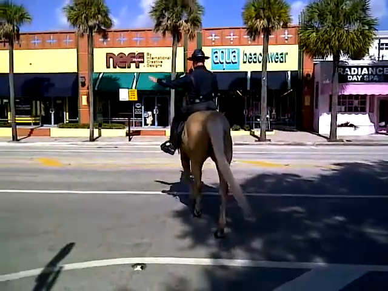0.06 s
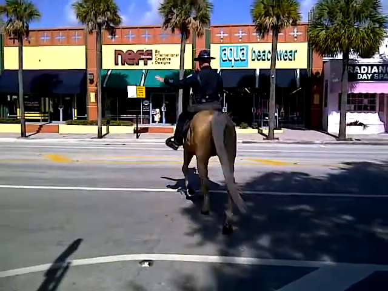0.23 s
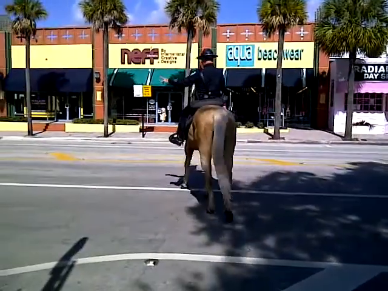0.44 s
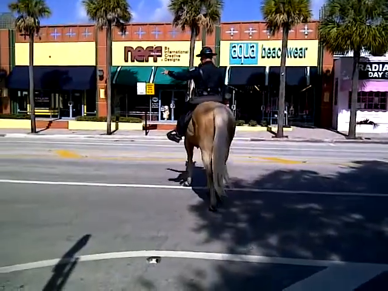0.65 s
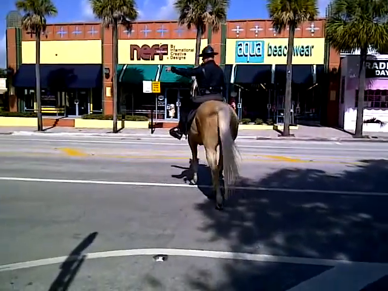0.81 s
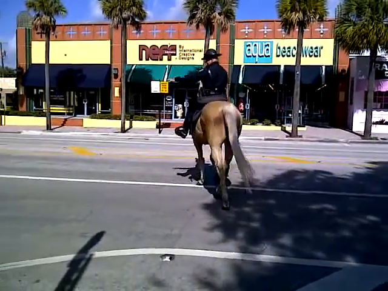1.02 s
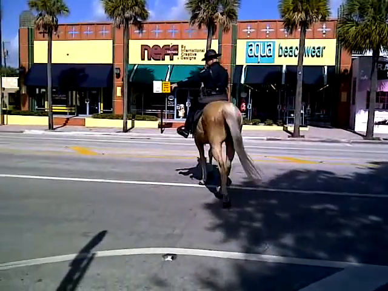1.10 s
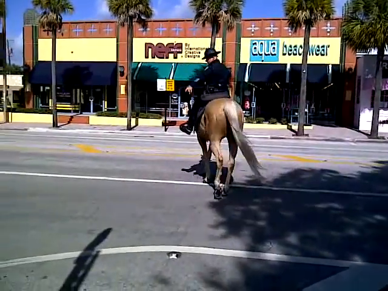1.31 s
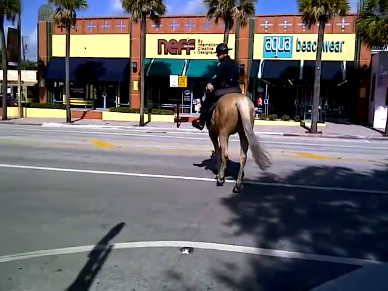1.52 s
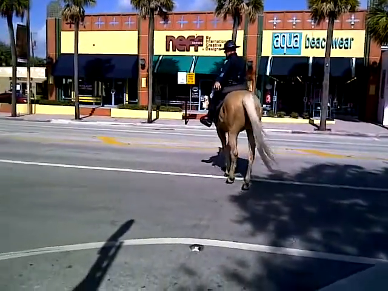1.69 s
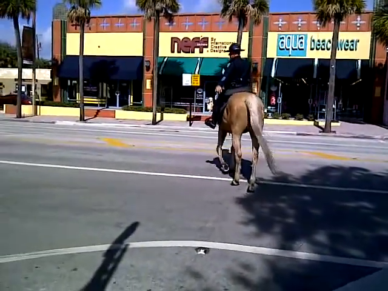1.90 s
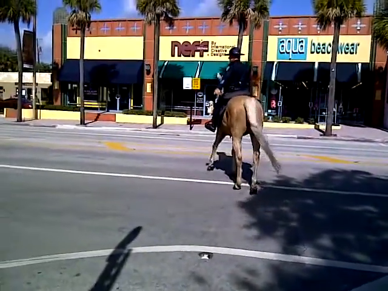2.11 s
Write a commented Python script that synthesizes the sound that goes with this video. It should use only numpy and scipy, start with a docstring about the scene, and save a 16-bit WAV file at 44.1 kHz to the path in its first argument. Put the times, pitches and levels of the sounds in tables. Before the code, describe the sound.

A shod horse walks on asphalt with about five sharp, hollow clops and slight gritty scrapes, the first step loudest. Shop fronts echo faintly, distant traffic hums throughout, and a brief low rumble rises near the end.

```python
"""A horse with iron shoes walks away over the asphalt of a wide shopping street.
Each step is a hard crack of the shoe, a clop from the hollow under the hoof and a little crushed
grit; now and then a shoe slides and scrapes. The shop fronts send back faint echoes.
Distant traffic hums throughout, and a low rumble swells near the end."""
import sys
import numpy as np
from scipy import signal
from scipy.fft import rfft, irfft
from scipy.io import wavfile
from scipy.ndimage import uniform_filter1d

SR = 44100
rng = np.random.default_rng(int(sys.argv[2]) if len(sys.argv) > 2 else 0)


def int16_out(signal):
    """Quantize to a 16-bit WAV file."""
    q = np.round(np.clip(np.atleast_2d(signal).T, -1, 1) * 32767)
    wavfile.write(sys.argv[1], SR, q.astype(np.int16))


N = 94815

TILT_PIVOT_HZ = 2000  # a positive tilt turns up what lies above this pitch and turns down what lies below


def undb(db):
    """Turn decibels (dB) into a number to multiply a sound by."""
    return 10 ** (np.asarray(db) / 20)


def noise(points, lo=0, hi=SR):
    """Noise of strength 1 shaped by (Hz, dB) points; only the part from lo to hi Hz is kept."""
    hz, db = np.array(points).T
    freqs = np.fft.rfftfreq(N, 1 / SR)
    gain = undb(np.interp(np.log(freqs + 1), np.log(hz), db)) * (freqs < hz[-1])
    band = rfft(rng.standard_normal(N)) * gain * (freqs >= lo) * (freqs < hi)
    return irfft(band, N) / np.sqrt(np.mean(gain ** 2))


def wander(rate):
    """A smooth random curve, typically of size 1, that takes about `rate` new values a second."""
    width = max(int(SR / rate), 1)
    steps = np.repeat(rng.standard_normal(N // width + 1), width)
    smooth = uniform_filter1d(uniform_filter1d(steps, width), width)[:N]
    return smooth / np.std(smooth)


def traffic():
    """Far traffic: bands of noise swell together and flicker alone, while the tyre noise recedes."""
    # The tone of the traffic. Each row: frequency in Hz, level in dB.
    spectrum = [(20, -27), (35, -15.5), (55, -2.5), (95, -6), (127, 0), (165, -5.5), (250, -4.5),
                (430, -11.5), (650, -9), (1000, -11.5), (1450, -12), (2000, -17.5), (2550, -23),
                (3200, -31.5), (4000, -35.5), (4700, -35.5), (6200, -44.5), (7000, -49.5), (8000, -68)]
    edges_hz = [0, 90, 180, 360, 720, 1440, 2880, 9000]
    level_db, tyres_from_hz, tyres_db_per_s = -41, 720, -1.0953
    swell_db = 0.8467 * wander(2.3)
    recede_db = tyres_db_per_s * (np.arange(N) - N / 2) / SR
    out = np.zeros(N)
    for lo, hi in zip(edges_hz, edges_hz[1:]):
        band = noise(spectrum, lo, hi)
        flicker_db = 0.4 * wander(18)
        out += band * undb(level_db + swell_db + flicker_db + recede_db * (lo >= tyres_from_hz))
    return out


def clop(t, hz, hold_s):
    """The hollow under the hoof sounds for a few uneven cycles, then the horse's weight damps it."""
    rise_s, decay_s = 0.000962, 0.001413
    pitch_hz = hz * (1 + 0.0478 * wander(478)[:len(t)])  # wavers as the hoof rolls flat
    tone = np.sin(2 * np.pi * np.cumsum(pitch_hz) / SR)
    return tone * (1 - np.exp(-t / rise_s)) * np.exp(-np.maximum(t - hold_s, 0) / decay_s)


def fade(t, seconds):
    """A level that falls by 60 dB, to a thousandth, in the given time."""
    return np.exp(-np.log(1000) * t / seconds)


def crack(t, tilt_db, detune=0.019, rise_s=0.0002):
    """The shoe hits the road and rings briefly, brighter if it lands on its edge, never twice alike."""
    # The ringing tones of shoe and hoof wall. Each row: pitch in Hz, level in dB, fade time in seconds.
    shoe_tones = [(610, -7, 0.0026), (1035, -6.5, 0.013), (1368, -2, 0.027), (1530, -13, 0.0013),
                  (2088, -5.5, 0.024), (2362, -8.5, 0.012), (2970, -17.5, 0.0094), (3241, -13, 0.016),
                  (4192, -13.5, 0.01904), (4597, -17, 0.0082), (5586, -19.5, 0.0097), (6390, -24, 0.012)]
    out = np.zeros(len(t))
    for hz, db, fade_s in shoe_tones:
        gain = undb(db + tilt_db * np.log2(hz / TILT_PIVOT_HZ))
        pitch_hz = hz * (1 + detune * rng.standard_normal())
        out += gain * fade(t, fade_s) * np.cos(2 * np.pi * pitch_hz * t)
    return out * (1 - np.exp(-t / rise_s))


def ring(t, hz, fade_s, rise_s=0.00023):
    """One tone that stands out in a step: a clack of the hoof wall or a ping of the iron."""
    return np.sin(2 * np.pi * hz * t) * (1 - np.exp(-t / rise_s)) * fade(t, fade_s)


def hooves():
    """Each touch of a hoof on the road makes a clop, a crack, a clack, a ping and a crunch of grit."""
    # Steps and light toe touches. Each row: start in seconds, clop pitch in Hz, clop level in dB,
    # clop hold in seconds, crack level in dB, crack tilt in dB per octave, grit level in dB,
    # grit decay in seconds, clack pitch in Hz, clack level in dB, ping pitch in Hz, ping level in dB.
    touches = [(0.2081, 847.4, -8, 0.00444, -19.5, 1, -29.5, 0.0046, 2850, -27.5, 4700, -35),
               (0.5817, 1520, -35.5, 0.00094, -46.5, 5, -55.5, 0.00375, 1600, -39, 5000, -58.5),
               (.5950, 1100, -23, 0.00075, -50.5, 3, -43.5, 0.0037, 1450, -41.5, 4250, -50),
               (0.6007, 778, -17.5, 0.00171, -32, -3, -37.5, 0.0063, 2519, -29.5, 4270, -41),
               (0.9702, 811, -16.5, 0.0028, -32, -2.5, -39.5, 0.00474, 1195, -26, 6200, -55),
               (1.2727, 1539, -26, 0.00227, -39.5, 1.5, -40.5, 0.0049, 2097, -27, 6480, -47),
               (1.338, 1290, -36, 0.0017, -51, 2, -49, 0.0072, 2795, -44, 4450, -56),
               (1.356, 1159, -40, 0.011, -62, -1.5, -53.5, 0.0025, 2800, -47.5, 4400, -65.5),
               (1.448, 1455, -40, 0.00724, -58, -5, -49.5, 0.0032, 1144, -43.5, 4900, -71),
               (1.7073, 801, -17, 0.00031, -34, -1.5, -33, 0.00237, 1143, -27, 5830, -47.5),
               (1.7118, 655.5, -44.5, 0.0038, -38, 5.5, -43.5, 0.0028, 2686, -37, 4170, -50),
               (1.7378, 843, -29, 0.0037, -51, 1.5, -42.5, 0.0035, 2170, -44, 4250, -65.5)]
    # The tone of crushed grit. Each row: frequency in Hz, level in dB.
    grit_spectrum = [(150, 2.5), (600, -3), (1400, 21.5), (2600, 22.5), (3600, -11), (4400, -4),
                     (5500, -16), (6700, -26.5), (8000, -29)]
    out, grit = np.zeros(N), noise(grit_spectrum)
    t = np.arange(SR // 10) / SR
    for (start, clop_hz, clop_db, hold_s, crack_db, tilt_db, grit_db, grit_decay_s,
         clack_hz, clack_db, ping_hz, ping_db) in touches:
        span = slice(int(start * SR), int(start * SR) + len(t))
        out[span] += undb(clop_db) * clop(t, clop_hz, hold_s)
        out[span] += undb(crack_db) * crack(t, tilt_db)
        out[span] += undb(clack_db) * ring(t, clack_hz, fade_s=0.01357)
        out[span] += undb(ping_db) * ring(t, ping_hz, fade_s=0.015)
        out[span] += undb(grit_db) * grit[span] * np.exp(-t / grit_decay_s)
    return out


def scuffs():
    """A shoe slides over grit as it lands or lifts: a grainy scrape, thinner when the touch is light."""
    # The slides. Each row: start in seconds, length in seconds, level in dB, tilt in dB per octave.
    slides = [(.213, 0.0229, -39.5, -0.5), (0.363, .06, -62, 10), (0.581, .034, -46, -0.5),
              (1.333, .04, -49, 1.5)]
    # The tone of scraping iron. Each row: frequency in Hz, level in dB.
    spectrum = [(300, -17.5), (800, -7.5), (1250, 3.5), (1900, -3.5), (2600, -11.5), (3400, -20),
                (4300, -20), (5500, -24), (6700, -29), (8000, -46.5)]
    out, t = np.zeros(N), np.arange(N) / SR
    for start, length, db, tilt_db in slides:
        progress = np.clip((t - start) / length, 0, 1)
        rise_and_fall = 2 * np.sqrt(progress * (1 - progress))
        scrape = noise([(hz, level + tilt_db * np.log2(hz / TILT_PIVOT_HZ)) for hz, level in spectrum])
        grain_db = 2 * wander(700)
        out += undb(db + grain_db) * rise_and_fall * scrape
    return out


def street_echoes(sound, tail_db=-27, tail_fade_s=0.57, tail_top_hz=5640):
    """The shop fronts bounce the sound back as two quick echoes and a faint, dull tail."""
    # The quick echoes. Each row: delay in seconds, level in dB.
    echoes = [(.0092, -16.5), (.0187, -23)]
    dull_noise = signal.sosfilt(signal.butter(2, tail_top_hz, fs=SR, output="sos"), rng.standard_normal(N))
    tail = dull_noise * fade(np.arange(N) / SR, tail_fade_s)
    response = undb(tail_db) * tail / np.sqrt(np.sum(tail ** 2))
    for delay, db in echoes:
        response[int(delay * SR)] += undb(db)
    return sound + signal.fftconvolve(sound, response)[:N]


def rumble(level_db=-39, start_s=1.8, rise_s=0.052, hold_s=0.1027, decay_s=0.178):
    """A low rumble rises quickly, holds a moment and fades."""
    # The tone of the rumble. Each row: frequency in Hz, level in dB.
    spectrum = [(20, -28), (45, -3), (75, -6.5), (112, 1), (170, -6), (260, -9.5), (400, -17), (550, -35),
                (750, -50), (3000, -68)]
    t = np.arange(N) / SR - start_s
    rise = np.clip(t / rise_s, 0, 1)
    fall = np.exp(-np.maximum(t - rise_s - hold_s, 0) / decay_s)
    return undb(level_db) * rise * fall * noise(spectrum)


def scene():
    """The horse and its echoes over the traffic and the rumble, in one channel."""
    horse = street_echoes(hooves() + scuffs())
    return (horse + traffic() + rumble())[None]


def record(dry, soften_hz=6200, cut_hz=7200):
    """A small microphone softens the high sounds and cuts off the very highest."""
    soft = signal.sosfilt(signal.butter(4, soften_hz, fs=SR, output="sos"), dry)
    return signal.sosfilt(signal.ellip(8, .2, 70, cut_hz, fs=SR, output="sos"), soft)


dry = scene()
out = record(dry)
int16_out(out)
```